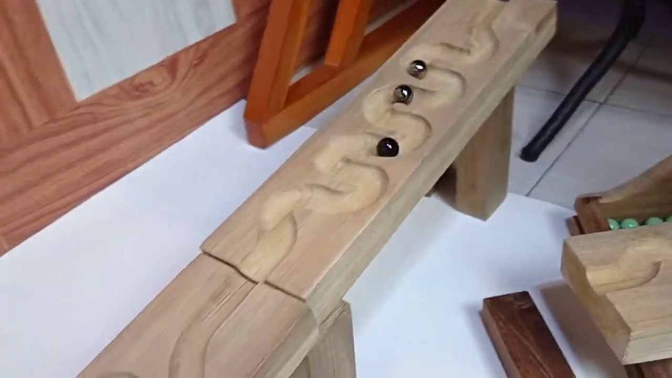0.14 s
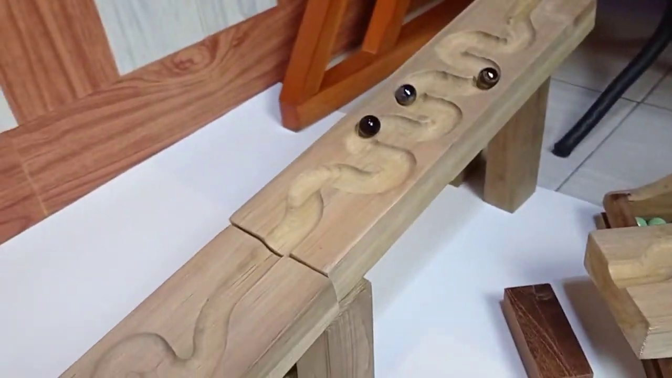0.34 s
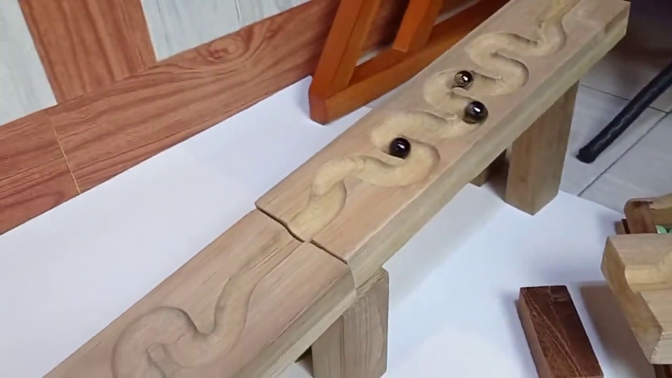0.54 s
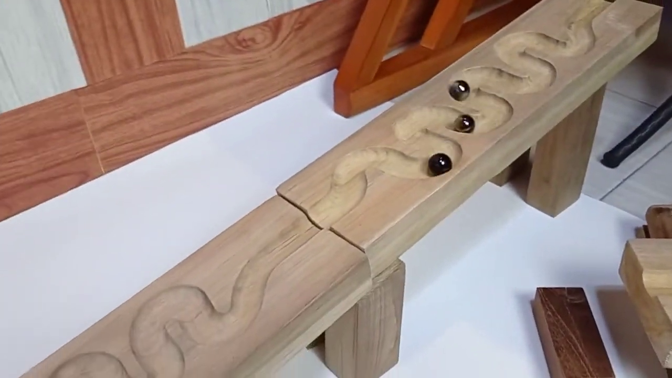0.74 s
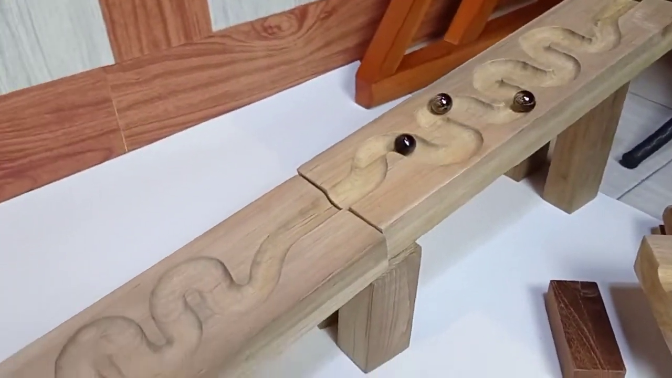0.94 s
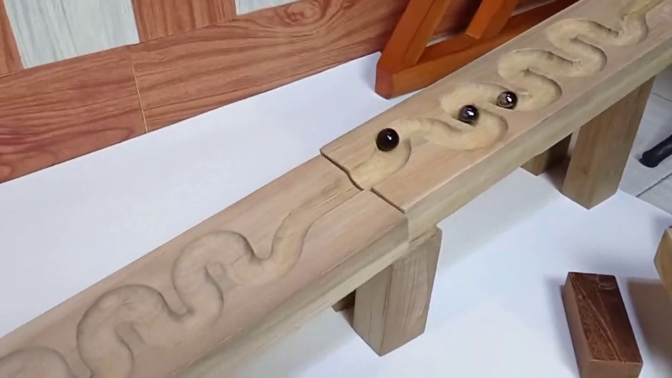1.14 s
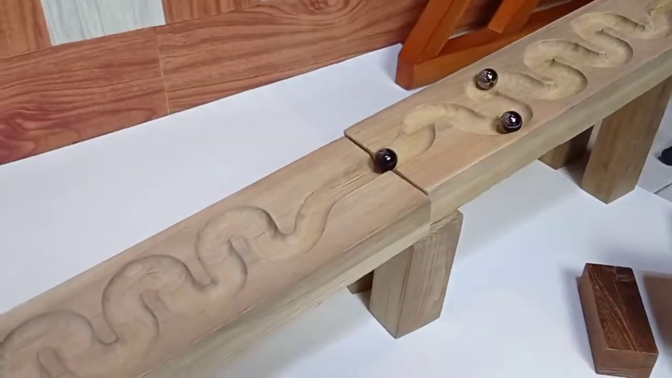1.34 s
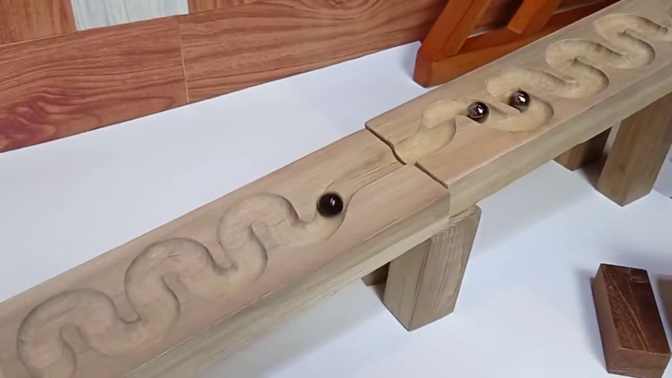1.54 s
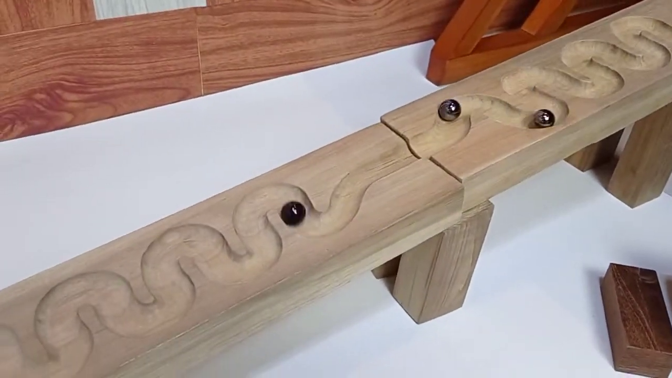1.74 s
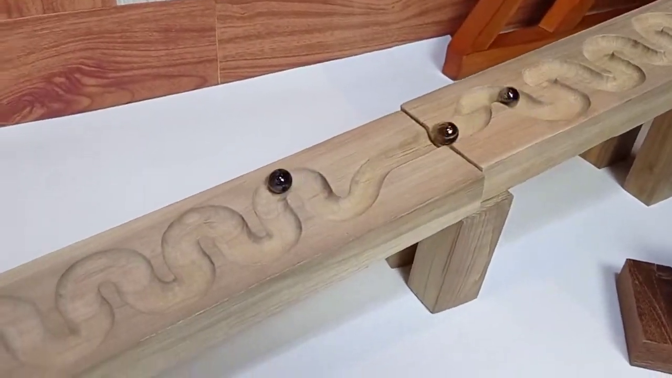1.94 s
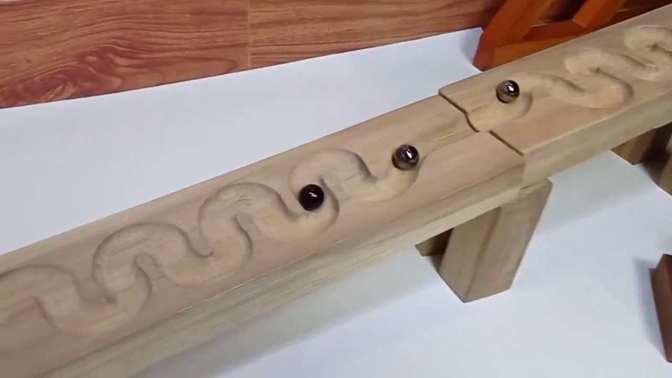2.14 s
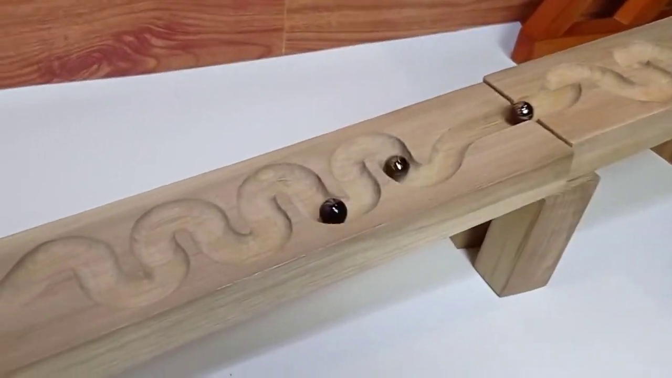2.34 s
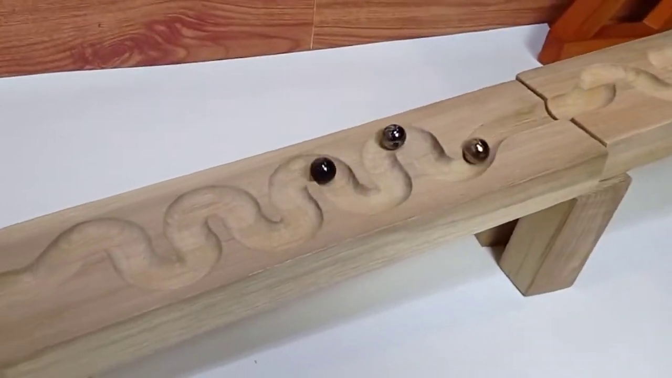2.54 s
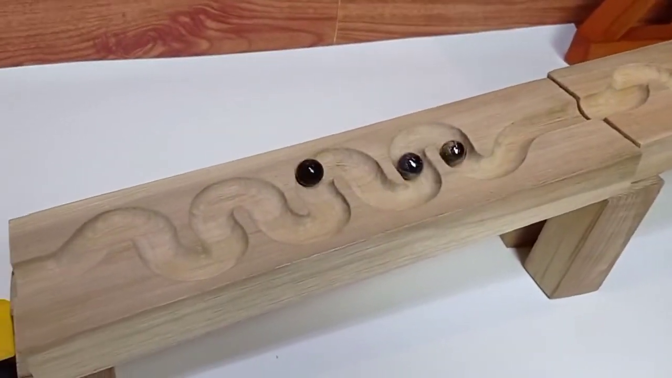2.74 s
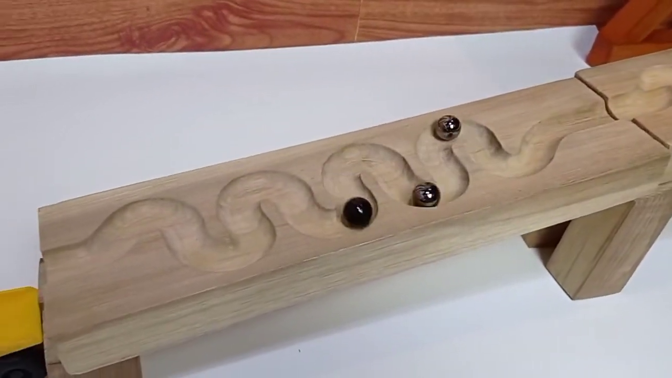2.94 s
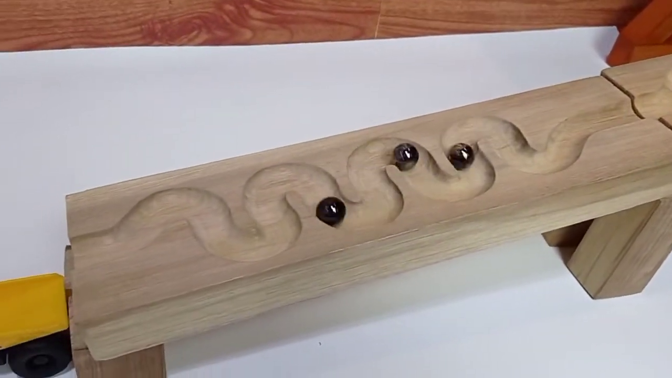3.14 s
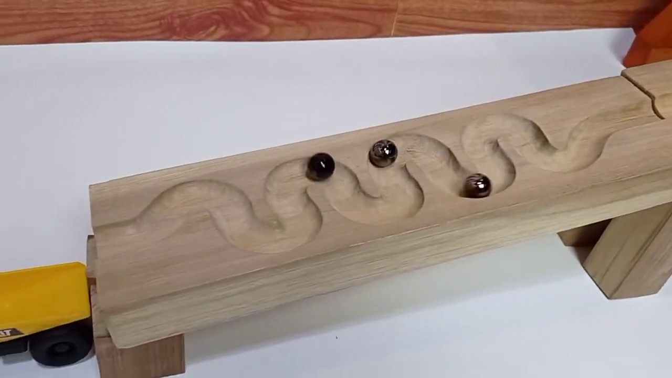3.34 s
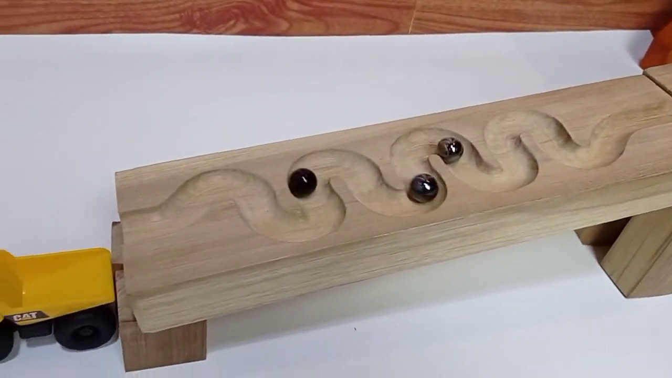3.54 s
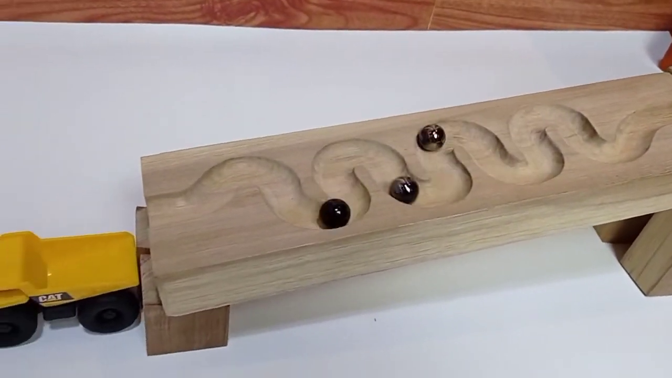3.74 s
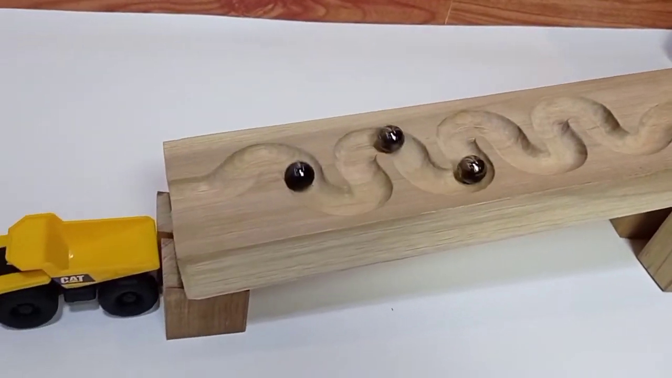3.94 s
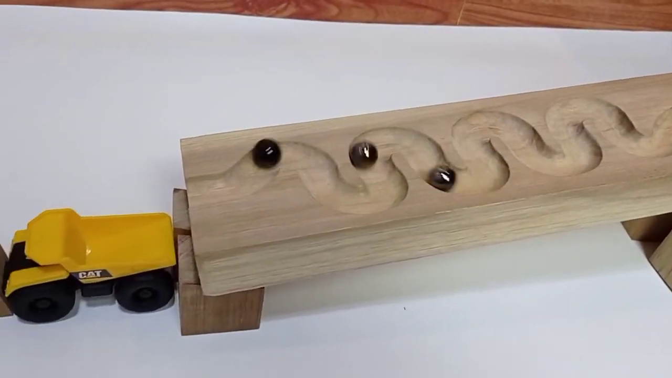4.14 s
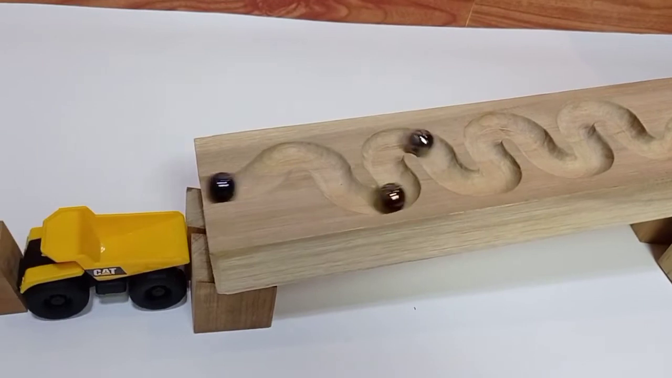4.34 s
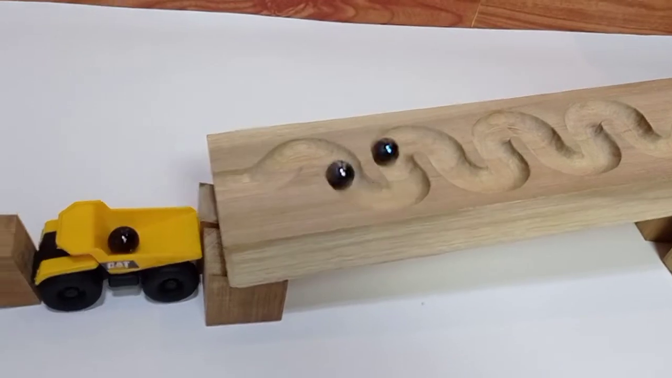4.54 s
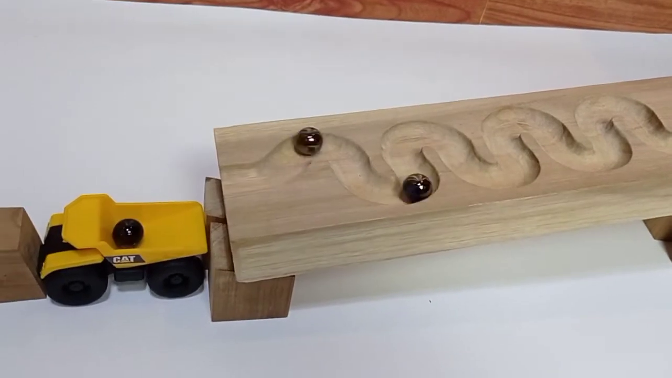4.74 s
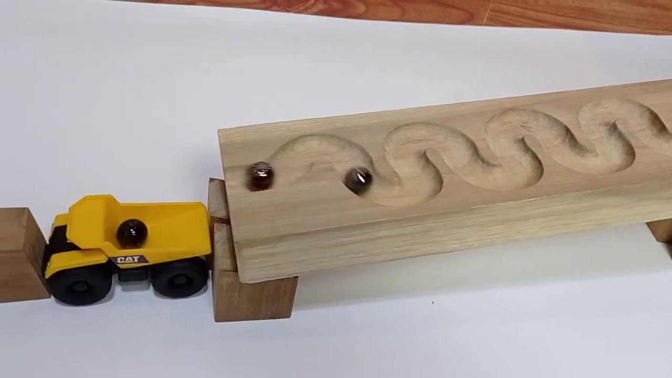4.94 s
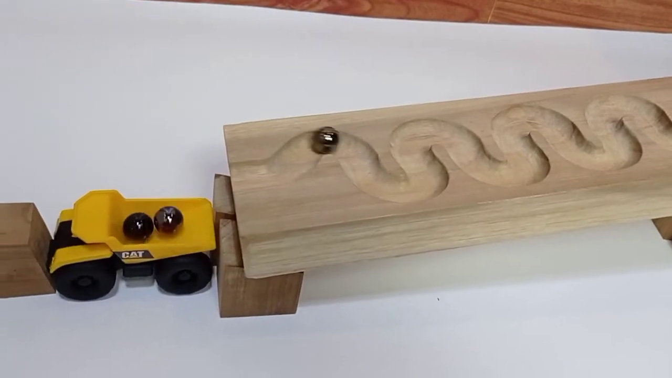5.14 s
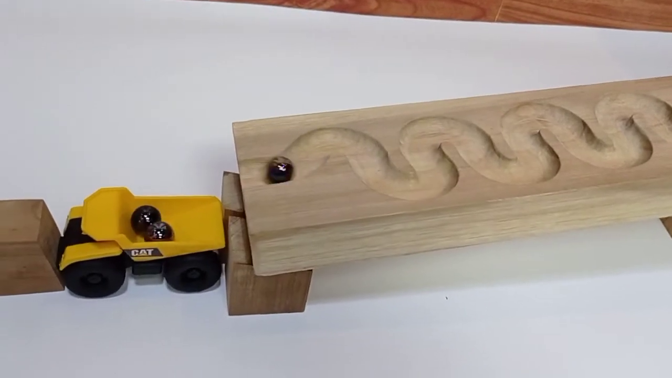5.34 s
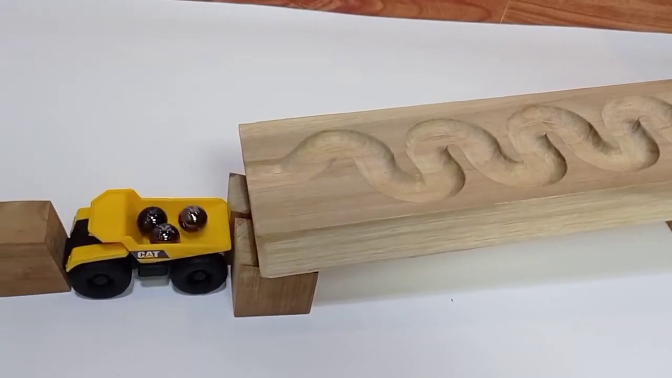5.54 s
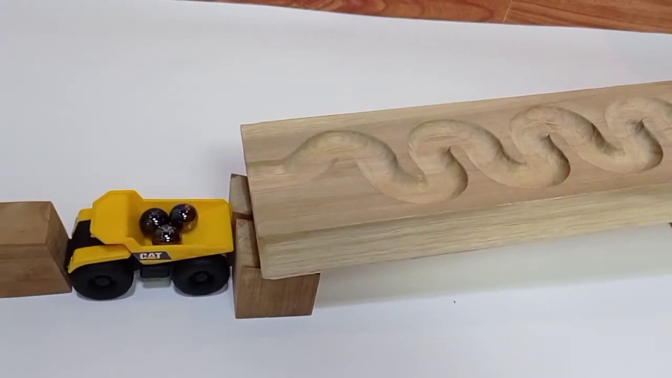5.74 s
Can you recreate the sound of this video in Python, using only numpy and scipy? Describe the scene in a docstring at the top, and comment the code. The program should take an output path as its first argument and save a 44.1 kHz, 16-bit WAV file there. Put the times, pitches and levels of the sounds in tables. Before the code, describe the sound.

Glass marbles rattle and knock down a winding wooden track, then drop one by one into a plastic toy truck with sharp clicks.

```python
"""Three glass marbles roll down the winding grooves of two wooden planks and drop one by one into
the plastic bed of a toy truck, where they bounce and click together. Knocks on the groove walls
and the grit of rolling ring the modes of the wood; the rattle swells in each bend. The drops ring
the thin plastic, short and bright. A small room, with a faint low drone from outside."""
import sys
import numpy as np
from scipy import signal
from scipy.fft import rfft, irfft
from scipy.io import wavfile

SR = 44100
rng = np.random.default_rng(int(sys.argv[2]) if len(sys.argv) > 2 else 0)


def file_out(sig):
    """Save sig as 16-bit WAV at sys.argv[1]."""
    # one column per channel
    cols = np.atleast_2d(sig).T
    # limit, then scale
    lim = np.clip(cols, -1, 1)
    pcm = np.round(lim * 32767).astype(np.int16)
    wavfile.write(sys.argv[1], SR, pcm)


N = 255761


def gain_of(db):
    """Decibels to amplitude."""
    return 10 ** (np.asarray(db) / 20)


def curve(rows, column=1):
    """An envelope: one column of a table, read at every sample."""
    table = np.array(rows)
    return np.interp(np.arange(N) / SR, table[:, 0], table[:, column])


def bandpass(x, band_hz, order=3):
    """Butterworth band-pass."""
    return signal.sosfilt(signal.butter(order, band_hz, "band", fs=SR, output="sos"), x)


def slow(hz):
    """A random modulator that drifts at about hz; power 1."""
    x = signal.lfilter(*signal.butter(2, hz, fs=SR), rng.standard_normal(N + SR))[SR:]
    return x / x.std()


def train(times, peak_db):
    """One impulse a blow."""
    blows = np.zeros(N)
    np.add.at(blows, np.round(np.asarray(times) * SR).astype(int), gain_of(peak_db))
    return blows


def decay(x, t60):
    """Gives every impulse an exponential tail."""
    return signal.lfilter([1], [1, -1000 ** (-1 / (t60 * SR))], x)


def grit(per_s, spread_db):
    """Tiny bumps at random moments, a few of them large; power 1."""
    size = gain_of(spread_db * np.minimum(rng.exponential(1, N), 4)) * rng.choice([-1., 1.], N)
    bumps = size * (rng.random(N) < per_s / SR)
    return bumps / np.sqrt(np.mean(bumps ** 2))


def ring(force, hz, t60, rise_s):
    """One struck mode as a complex resonator: it swells over rise_s, then dies."""
    turn = np.exp(2j * np.pi * hz / SR)
    die = 1000 ** (-1 / (max(t60, .004) * SR))
    swell = np.exp(-1 / (max(rise_s, 1e-5) * SR))
    return signal.lfilter([1 - swell], np.convolve([1, -die * turn], [1, -swell * turn]), force)


def body(modes, edges_hz, times, blow_db, rubbing, spot_db, rise_s, waver_rad):
    """A resonant body: each mode is struck and rubbed at the level of its band."""
    at = np.round(np.asarray(times) * SR).astype(int)
    fineness = 1 + np.array(modes)[:, 0] / 6000  # high modes change over shorter distances
    # each blow lands on another spot, which favours other modes
    spot = gain_of(spot_db * fineness * rng.standard_normal((len(at), len(modes))))
    drift = np.exp(1j * waver_rad * slow(hz=26.8))  # the moving weight makes the modes waver
    out = np.zeros(N)
    for k, (hz, db, t60) in enumerate(modes):
        band = np.searchsorted(edges_hz, hz)
        force = rubbing[band].copy()
        np.add.at(force, at, spot[:, k] * gain_of(blow_db[band]))
        own_drift = np.roll(drift, k * N // len(modes))
        out += gain_of(db) * (ring(force, hz, t60, rise_s) * own_drift).imag
    return out


def crack(force, band_hz, t60):
    """The dense small modes of a struck thing blur into a short burst of noise."""
    return bandpass(decay(abs(force), t60) * rng.standard_normal(N), band_hz)


# Rattle swells, one a bend: t/s of the crest, level/dB, release/(dB/s)
BEND_SWELLS = [(0.018, -44.5, 57), (0.368, -42.5, 83), (0.64, -43.5, 42), (0.972, -47.5, 32),
               (1.342, -43.5, 42.5), (1.621, -43.5, 43), (1.961, -41, 68), (2.3, -44.5, 30),
               (2.408, -43, 102), (2.671, -43.5, 73), (3.032, -45, 60), (3.3, -46.5, 46),
               (3.418, -44.5, 150), (3.679, -50.5, 34), (3.839, -45.5, 98), (4.038, -48, 34),
               (4.382, -44, 60), (4.57, -47.5, 147), (4.73, -63.5, 75.5), (4.82, -57.5, 99.5),
               (4.999, -52, 132), (5.439, -52.5, 202.5)]
# Rattle floor on the straights, thinning as the marbles leave: t/s, level/dB
STRAIGHT_LEVEL = [(0, -64), (0.9, -66), (1.28, -64), (2.5, -56), (3.55, -56), (4.3, -55), (4.65, -75.5),
                  (5.54, -71)]


def rolling_envelope(attack_db_per_s=153.5):
    """Rattle level in dB: it swells as marbles swing through a bend, then falls back."""
    crest_s, crest_db, release = np.transpose(BEND_SWELLS)[:, :, None]
    since = np.arange(N) / SR - crest_s
    swells = crest_db + np.where(since < 0, attack_db_per_s, -release) * since
    return np.maximum(swells.max(axis=0), curve(STRAIGHT_LEVEL))


def rolling():
    """Glass rattles over the grain of the wood: one force for each plank band, low to high."""
    level_db = rolling_envelope()
    rattle = gain_of(level_db) * grit(per_s=1100, spread_db=4)
    rattle[round(STRAIGHT_LEVEL[-1][0] * SR):] = 0  # the last marble has left the planks
    band_gain = gain_of(np.c_[[-27, -27, -23, -30, -30, -29, -47]])
    # faster rolling reaches the higher modes more
    brightness = gain_of(np.minimum(0.98 * (level_db + 40.5), 3))
    return rattle * band_gain * brightness ** np.c_[[0, 1, 1, 1.5, 1.5, 1.5, 1.5]]


# Hits on the groove walls: t/s, main ring level/dB,
# then offsets from it: thud/dB, low ring/dB, high rings/dB, tick/dB
WALL_KNOCKS = [(0.0202, -35.5, -8, -2.5, -12.5, -35), (0.0323, -30.5, -7.5, -14, -25, -36),
               (0.1446, -36, -10, -15, -25, -46), (0.2098, -47.5, 2, -9, -24, -28),
               (0.2584, -32.5, -13, -6, -4, -27), (0.2711, -43, 2, -21, -15.5, -30),
               (0.325, -40, -3, -3, -11.5, -34), (0.3374, -35.5, -24, -7.5, -21, -30),
               (0.3653, -21.5, -9, -24, -22, -36), (0.3933, -33, -14.5, -25, -23, -20),
               (0.4265, -42, -2, -10.5, -6, -48), (0.5091, -44.5, -1, -17, -16, -43),
               (0.5776, -50, 1, -10, -17, -28), (0.5996, -39, -19, -5, -11, -22),
               (0.6177, -39.5, 5, -7, -3.5, -17), (0.6498, -33.5, -31, -12, -2.5, -19.5),
               (0.6967, -31.5, -8, -27, -9, -23), (0.7113, -26, -14, -21, -23, -28),
               (0.8335, -40.5, -1.5, -20, -29, -52), (0.9564, -34, -12, -12, -9, -34),
               (0.9734, -31, -7, -14, -35, -30), (1.004, -50, 4, -14, -10, -26),
               (1.044, -32.5, -7, -13, -14.5, -35), (1.1026, -41, -21, -16, -20, -30),
               (1.1302, -44, 3, -3, -11, -22), (1.1869, -43.5, 1, -19, -46, -39),
               (1.249, -59.5, -2, -11, 5.5, -7), (1.3032, -25.5, -10.5, -7.5, -8, -29.5),
               (1.3308, -23.5, -7.5, -18, -12.5, -33), (1.3511, -30, 0, -13, -28, -25),
               (1.4112, -25, -18, -13, -13, -29), (1.4293, -32, -4.5, -28, -37, -25),
               (1.5648, -32, -14, -19, -17, -13.5), (1.5821, -40, 8, -16, 5.5, -13),
               (1.6, -32.5, -12, -27.5, -2, -10.5), (1.6251, -34.5, -7, -14, -18, -13),
               (1.6674, -34, -0.5, -18, -3, -23), (1.708, -26.5, -12.5, -24, -12, -44),
               (1.7486, -38.5, 0, -18, -21, -39), (1.909, -35.5, -3.5, -9, -9, -16.5),
               (1.928, -30, -2, -6.5, -13.5, -33), (1.957, -30, -4, -13, -27, -45),
               (1.9789, -31, -4, -19, -36, -31), (2.0248, -23.5, -7, -13, -6, -25.5),
               (2.0479, -28.5, -7, -20, -18, -29), (2.0933, -45, 7.5, 1, 0, -30),
               (2.1823, -35, -6, -11, -10, -17.5), (2.2026, -36, 2.5, -12.5, 4.5, -24),
               (2.2234, -38, -1.5, -16, 1, -14.5), (2.2481, -40.5, 0, -6, -13, -28),
               (2.268, -40.5, 1.5, -6.5, -17, -24), (2.2821, -33, -3.5, -12, -12, -23),
               (2.2931, -27.5, -8.5, -14, -6, -31), (2.3235, -29, -5, -11, -11, -37),
               (2.343, -29, -5, -11, -25, -41), (2.3898, -27, -8, -16, -2, -24),
               (2.4058, -36, 2, -16, -8, -21), (2.4676, -34, -0.5, -11, -8.5, -41),
               (2.5298, -30, -9.5, -25, -3, -19), (2.5463, -32, -5, -10, -11, -28),
               (2.5658, -30.5, -2, -21, 0, -23), (2.5878, -31.5, -11, -18, -5, -21),
               (2.6167, -34, 0.5, -13, -12, -17), (2.6451, -36.5, 2, -4, 6, -25),
               (2.6649, -25.5, -9, -22, 0, -14.5), (2.6985, -31, -3, -15.5, -7, -33),
               (2.7298, -34, -9, -14, -18, -35), (2.7449, -32, -4.5, -15, -12.5, -28),
               (2.7784, -38.5, -5, -12, -12.5, -27), (2.7984, -42.5, 0.5, -6, -10, -35),
               (2.8808, -43.5, 3, -6, -11, -25), (2.9032, -37.5, 1.5, -10, -17.5, -38),
               (2.9589, -50, 8, -8, -11, -31), (2.9817, -44, -9, 0, -6, -29),
               (3.0139, -36.5, -1, 1.5, -6, -11.5), (3.0444, -38, 1, 0, -19, -36),
               (3.096, -48, -4, 2, -8, -28), (3.1981, -41, -4.5, -8, -19, -44),
               (3.26, -34, -12, 0, 0.5, -21), (3.271, -43.5, 8, 6, -15, -30),
               (3.297, -45, -12, -12, -17, -27), (3.316, -35, -9, -10, -22, -29),
               (3.3836, -41, 6, 6.5, -0.5, -16), (3.4048, -35.5, 0.5, 3, -2, -23),
               (3.4709, -59, 0, -9, -1, -2), (3.4924, -66, 5, 4, -7, -21),
               (3.5763, -52.5, 3.5, -9, -28, -43), (3.6481, -50.5, 5, 6, -0.5, -37),
               (3.6592, -50.5, 10, 13, -12, -28), (3.6733, -47.5, 8, 4, 2, -26),
               (3.6918, -54.5, 13.5, 13, -2, -25), (3.7508, -44.5, 3.5, 4, -10, -22),
               (3.7687, -36.5, 2, -2, -16, -40), (3.8415, -34, -10, -15, -7.5, -25),
               (3.974, -49.5, 0, -12, -12, -37), (4.0106, -42.5, -1, 3, -1, -25),
               (4.0343, -37, -3.5, -0.5, -0.5, -19), (4.048, -45, 0, 9, -15, -22),
               (4.1129, -33, -8, -10, -8, -20), (4.1635, -46, 5, -2, -16, -29),
               (4.214, -38.5, -6.5, -7, -18, -33), (4.341, -34, -8, -2, -14, -27),
               (4.366, -22.5, -11.5, -21, -4.5, -39), (4.3956, -30, -10, -7.5, -8, -38),
               (4.4366, -30, -15, -10, -8.5, -19.5), (4.7222, -53.5, 1.5, -2, -19, -41),
               (4.793, -47.5, -6, -9, -23, -42.5), (4.809, -41.5, -0.5, -8.5, -19, -50),
               (4.82, -42.5, -6.5, -11, -18.5, -47), (4.8968, -37, -11, -17, -15.5, -28),
               (4.9628, -41.5, 1.5, 2, -9, -21), (4.9868, -25.5, -12.5, -21.5, -4.5, -36.5),
               (5.005, -26.5, -11.5, -20.5, -9.5, -36), (5.3832, -42, 2, -3.5, -12, -21),
               (5.4122, -22.5, -15, -20.5, -7, -47), (5.431, -26, -12, -27, -7.5, -46),
               (5.4491, -30, -11, -13.5, -30, -50)]
# Crossfade from the upper plank to the lower: t/s, share of the marbles on the lower/(0-1)
LOWER_SHARE = [(0, 0.25), (1.29, 0.42), (1.31, 0.46), (1.9, 0.62), (2.25, 0.8), (2.9, 0.96), (5.8, 0.95)]
# Resonances of each plank: f/Hz, level/dB, t60/s
UPPER_MODES = [(590, -7, 0.034), (751, -1.5, 0.028), (966, -1.5, 0.072), (1229.6, -1, 0.072),
               (1350, -4, 0.044), (1710, -12, 0.29), (1985, -4, 0.14), (2370, -12.5, 0.099),
               (2540, -16, 0.087), (2602, -2.5, 0.19), (2743, -19, 0.15), (3098, -13, 0.15),
               (3316, -0.5, 0.1), (3380, -18, 0.15), (3960, -12.5, 0.044), (4346, -4, 0.038),
               (4840, -3, 0.021), (5900, -3.5, 0.035), (6400, -3.5, 0.033), (7560, -10.5, 0.028),
               (8150, -22, 0.02)]
LOWER_MODES = [(640, -37.5, 0.047), (680.3, -8.5, 0.064), (796, -15.5, 0.27), (905, -0.5, 0.023),
               (1032, 2, 0.018), (1286, 2.5, 0.034), (1487, -3.5, 0.026), (1911, 1, 0.057),
               (2200, -9, 0.088), (2352, -13, 0.06), (2677.4, -3, 0.08), (2750, -14, 0.095),
               (2950, -6, 0.031), (3313, -2, 0.044), (3824, 3, 0.023), (4454, -10, 0.096),
               (4998, -2, 0.018), (5250, -25, 0.031), (5640, 1.5, 0.014), (6130, -3.5, 0.013),
               (6620, -8, 0.052), (7180, -12, 0.021), (8650, -18, 0.024), (8260, -18.5, 0.054),
               (9730, -22, 0.022), (10600, -16.5, 0.0044)]
# Crossovers between the seven plank bands: f/Hz
PLANK_CROSSOVERS = [1700, 2250, 3100, 3650, 4150, 5400]
# EQ of the lower plank, low band to high: level/dB
LOWER_EQ = [-1, 2, -1, -2, 2.5, -3.5, 1.5]


def planks():
    """Wall knocks and rolling ring two wooden planks, the sound shifting to the lower one."""
    times, main, thud, low, high, tick = np.transpose(WALL_KNOCKS)
    blow_db = main + np.array([thud - 4, low - 3, np.full_like(main, -3), 0.28 * high - 7,
                               high - 4, high - 1, tick - 2])
    rubbing = rolling()
    # after each knock the marble chatters on along the wall
    chatter = decay([train(times, db) for db in blow_db], t60=0.14)
    rubbing += gain_of(-35) * chatter * grit(per_s=1500, spread_db=3)
    out = crack(train(times, blow_db[0] - 5) + 1.3 * rubbing[0], (520, 1700), t60=0.02)
    out += crack(train(times, blow_db[4] + 8), (1400, 4000), t60=0.035)
    out += crack(train(times, blow_db[6] - 14), (6500, 8000), t60=0.014)
    lower = curve(LOWER_SHARE)
    for modes, share, eq_db in ((UPPER_MODES, 1 - lower, 0), (LOWER_MODES, lower, np.c_[LOWER_EQ])):
        share_db = 10 * np.log10(share[(times * SR).astype(int)])
        plank_rubbing = rubbing * np.sqrt(share) * gain_of(eq_db)
        out += body(modes, PLANK_CROSSOVERS, times, blow_db + share_db + eq_db, plank_rubbing,
                    spot_db=1.8, rise_s=0.0008, waver_rad=1.1)
    # soft wood keeps the contact long, so little treble passes; thin planks radiate little bass
    return bandpass(out, (330, 10000))


# Tone of the air: f/Hz, relative level/dB
AIR_SPECTRUM = [(20, -32), (50, -22), (110, -15.5), (200, 0), (280, 3), (420, -6.5), (600, -26),
                (900, -46.5)]
# Fader ride on the air: t/s, level/dB
AIR_RIDE = [(0.0, -72.5), (3.49, -72), (3.63, -77.5), (4.26, -68), (4.7, -82.5), (5.56, -71), (5.8, -74.5)]


def moving_air():
    """A dull wash of air whose level drifts slowly."""
    hz = np.fft.rfftfreq(N, 1 / SR)
    point_hz, point_db = np.transpose(AIR_SPECTRUM)
    tone = gain_of(np.interp(np.log(hz + 1), np.log(point_hz + 1), point_db))
    air = irfft(rfft(rng.standard_normal(N)) * tone, N)
    return gain_of(curve(AIR_RIDE) + 1.7 * slow(hz=0.83)) * air / air.std()


# Voices of the drone: f/Hz, t60/s, offset from the fader/dB
DRONE_HUMS = [(67.3, 0.94, -5.5), (102, 0.31, -1.5), (133.3, 0.32, -2.5), (164.9, 0.19, -8)]
# Fader rides on the drone: t/s, low pair level/dB, high pair level/dB
DRONE_RIDE = [(0.0, -81, -72), (0.03, -75, -78), (0.48, -77.5, -80.5), (1.55, -69, -76), (1.58, -67, -68.5),
              (2.62, -75, -68.5), (3.07, -66.5, -71), (3.52, -73.5, -59.5), (3.63, -71.5, -73.5),
              (5.8, -72.5, -66.5)]


def drone(wander_db=4):
    """Four fuzzy hums from outside come and go, each a resonance driven by noise."""
    out = np.zeros(N)
    for k, (hz, t60, offset_db) in enumerate(DRONE_HUMS):
        hum = ring(rng.standard_normal(N), hz, t60, rise_s=0.0029).imag
        level_db = curve(DRONE_RIDE, column=1 + k // 2) + offset_db + wander_db * slow(hz=2.9)
        out += gain_of(level_db) * hum / hum.std()
    return out


def scrape(start_s=0.3, crest_s=0.42, end_s=0.45):
    """A brief hissy scrape: fine grit in the treble that swells and stops."""
    envelope = np.interp(np.arange(N) / SR, (start_s, crest_s, end_s), [0, 1, 0])
    hiss = bandpass(grit(per_s=1200, spread_db=4), (5000, 11000), order=2)
    return gain_of(-69.5) * envelope * hiss


# Hits in the truck bed: t/s, click level/dB, then offsets from it: plastic knock/dB, snap/dB
BED_HITS = [(4.5133, -16.5, -5, -5.5), (4.5447, -56, 9, -21), (4.569, -20.5, -14.5, -2),
            (4.5827, -43, -1, -3.5), (4.5973, -32.5, -15, -17), (4.6078, -31, -12.5, -13),
            (5.1478, -15, -5, -7.5), (5.1709, -19.5, -14.5, 0), (5.2022, -17, -22, -16),
            (5.2085, -20, -15, -15), (5.2403, -56, 10, 4), (5.3145, -61, -1, -9),
            (5.3327, -28.5, -19, -16.5), (5.5629, -17.5, -3, -7.5), (5.574, -22, -14, -6),
            (5.5768, -49, -12, 5.5), (5.6216, -21.5, -15, -13.5), (5.6348, -28.5, -7.5, -9),
            (5.6524, -20, -19, -8), (5.6814, -49.5, 5.5, 8)]
# Resonances of the bed: f/Hz, level/dB, t60/s
BED_MODES = [(330, -34, .05), (700, -28, .03), (1244, -15, .02), (1500, -13, .025), (1790, -2, .02),
             (1890, 0, .035), (2210, -10, .03), (2560, -5, .03), (2820, -3, .03), (3110, -8, .03),
             (3640, 0, .035), (4400, -2, .015), (4580, 0, .016), (4870, -1, .014), (5180, -2, .014),
             (5500, -6, .014), (6230, -2, .014), (6570, 0, .013), (7000, -9, .012), (7950, -4, .018),
             (8530, -7, .018), (9160, -11, .018), (9940, -16, .015), (11400, -6, .015), (12200, -11, .012),
             (13600, -11, .012), (14300, -5, .015), (14900, 0, .02), (15300, -8, .015)]
# Crossovers between the five bed bands: f/Hz
BED_CROSSOVERS = [2400, 4100, 5700, 10500]


def truck_bed():
    """Hard blows on thin plastic and glass on glass; the marbles skid for a moment after each."""
    times, click, knock, snap = np.transpose(BED_HITS)
    blow_db = click + np.array([knock + 3, 0.86 * knock - 5, np.full_like(click, -5),
                                snap - 1, 0.5 * snap + 0.45 * knock - 15])
    skids = np.array([ring(train(times, db), hz=0, t60=0.036, rise_s=0.015).real for db in blow_db])
    rubbing = gain_of(-36) * skids * grit(per_s=1200, spread_db=4)
    out = body(BED_MODES, BED_CROSSOVERS, times, blow_db, rubbing,
               spot_db=1.5, rise_s=0.0006, waver_rad=1.2)
    out += crack(train(times, blow_db[0] - 1.5) + 1.66 * rubbing[0], (980, 4000), t60=0.038)
    out += crack(train(times, blow_db[3] + 3) + 0.5 * rubbing[3], (4550, 9000), t60=0.026)
    out += crack(train(times, blow_db[4] - 1) + 0.58 * rubbing[4], (7300, 15300), t60=0.018)
    low_cut = signal.butter(2, 220, "high", fs=SR, output="sos")  # a small toy has little bass
    return signal.sosfilt(low_cut, out)


def room(x, t60, predelay_samples=120, top_hz=9000):
    """Sparse reflections of random sign that die away, duller than the direct sound."""
    size, spacing = SR // 2, 20
    taps = np.zeros(size)
    at = np.arange(predelay_samples, size - spacing, spacing)
    taps[at + rng.integers(0, spacing, len(at))] = rng.choice([-1., 1.], len(at))
    taps *= gain_of(-60 * np.arange(size) / SR / t60)
    taps = signal.lfilter(*signal.butter(1, top_hz, fs=SR), taps)
    return signal.oaconvolve(x, taps / np.linalg.norm(taps))[:N]


def scene():
    """Mono mix: wood and plastic with a short room send, over air, drone and faint hiss."""
    wood = planks() + scrape()
    plastic = truck_bed()
    reverb = room(gain_of(-17) * wood + gain_of(-14) * plastic, t60=0.15)
    ambience = moving_air() + drone() + gain_of(-98) * rng.standard_normal(N)
    return (wood + plastic + reverb + ambience)[None]


def record(dry):
    """A steep high cut at 16 kHz on the mix."""
    high_cut = signal.firwin(151, 16000, window=("kaiser", 9), fs=SR)
    return signal.oaconvolve(dry, high_cut[None], "same")


dry = scene()
out = record(dry)
file_out(out)
```